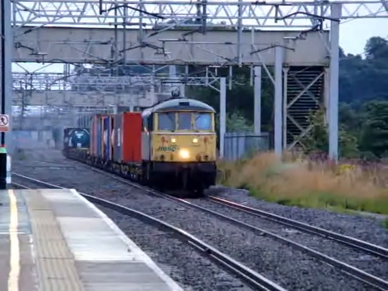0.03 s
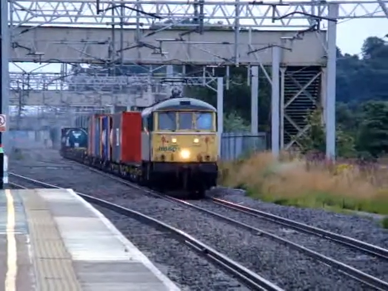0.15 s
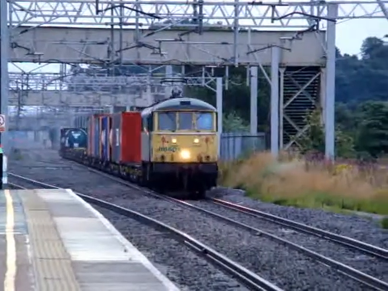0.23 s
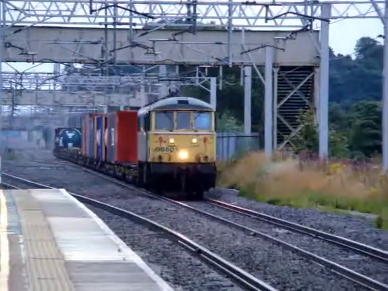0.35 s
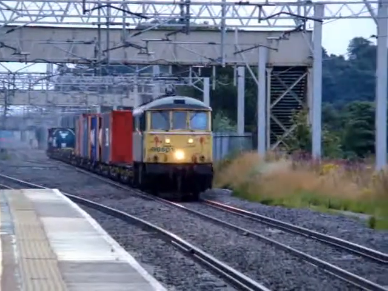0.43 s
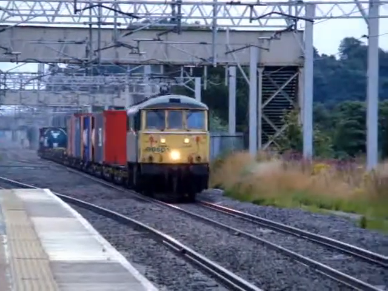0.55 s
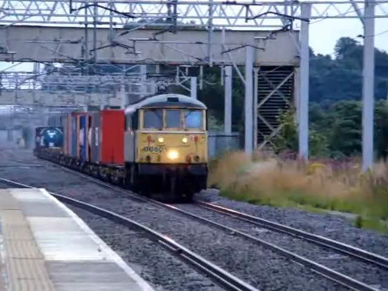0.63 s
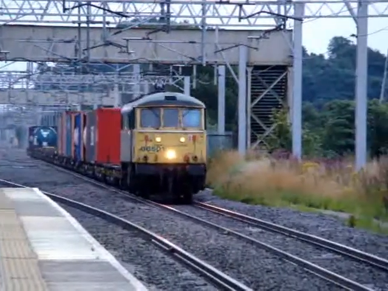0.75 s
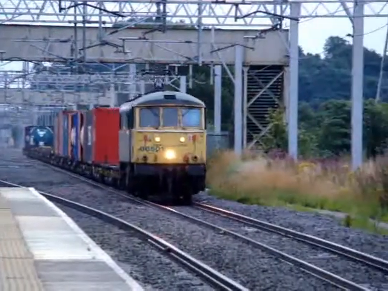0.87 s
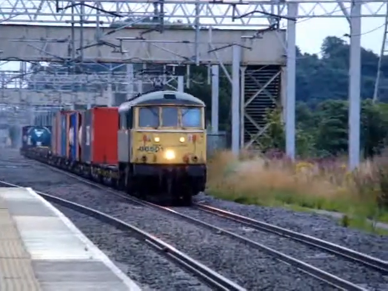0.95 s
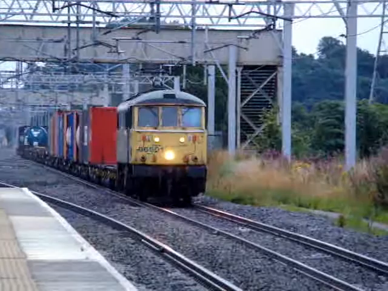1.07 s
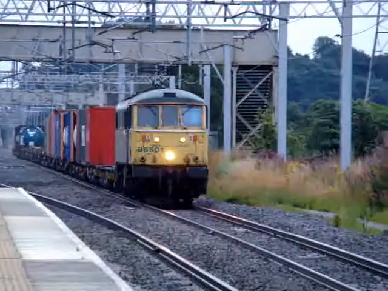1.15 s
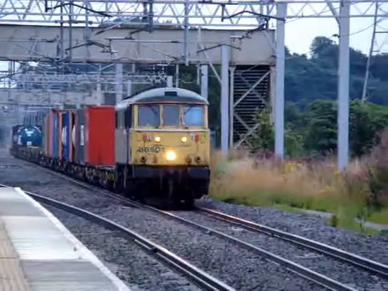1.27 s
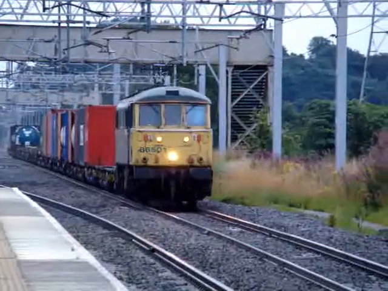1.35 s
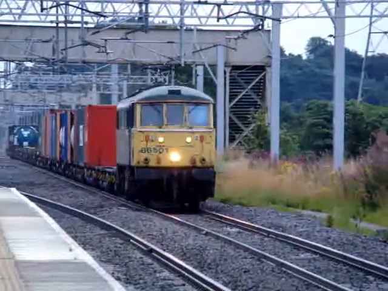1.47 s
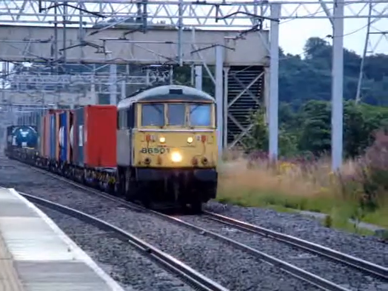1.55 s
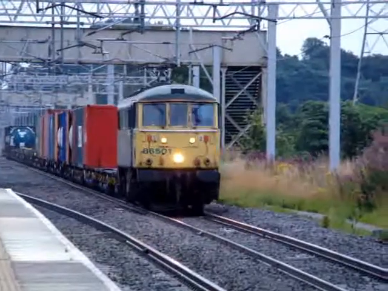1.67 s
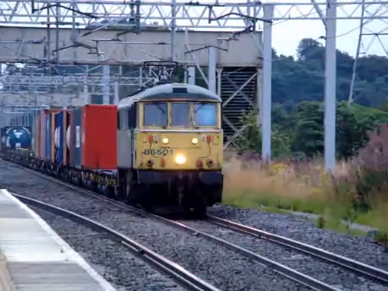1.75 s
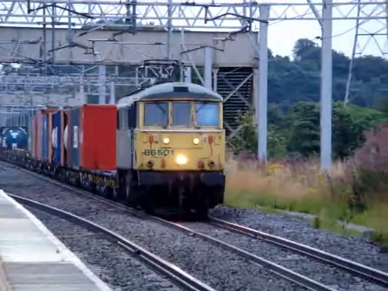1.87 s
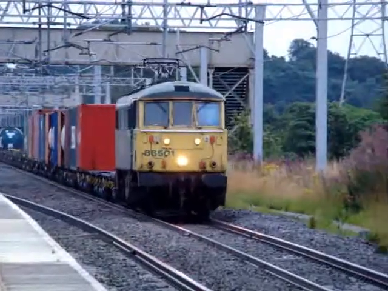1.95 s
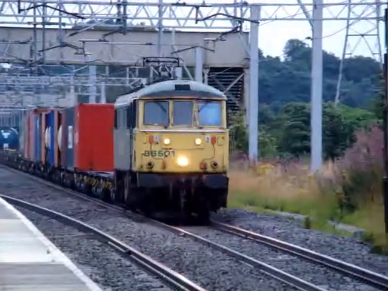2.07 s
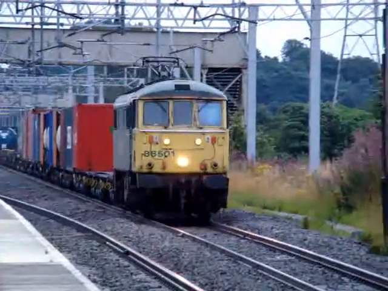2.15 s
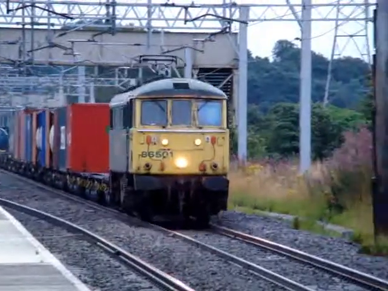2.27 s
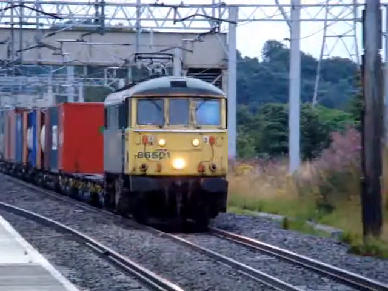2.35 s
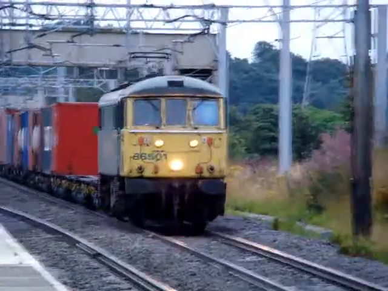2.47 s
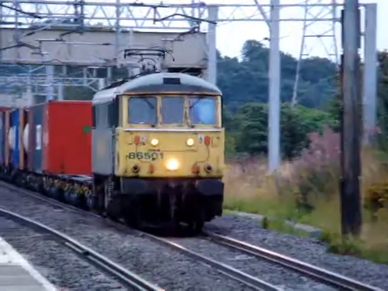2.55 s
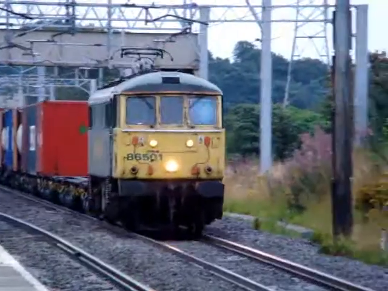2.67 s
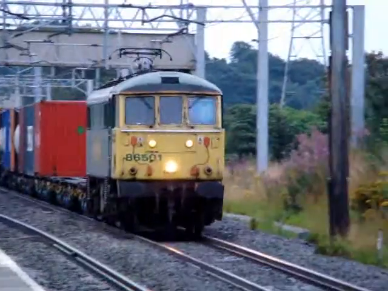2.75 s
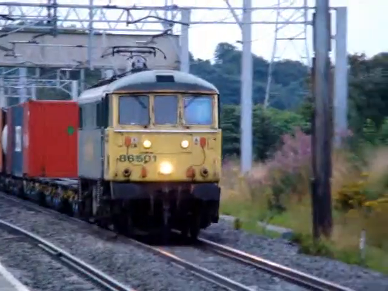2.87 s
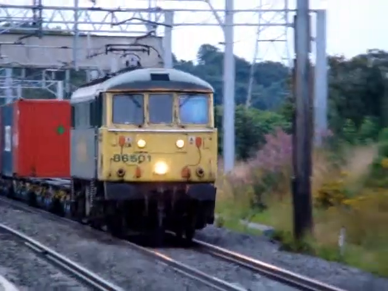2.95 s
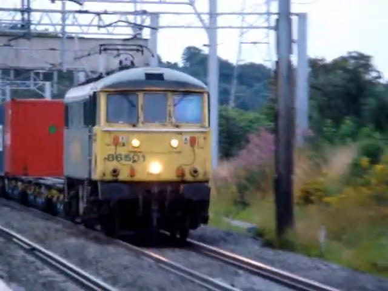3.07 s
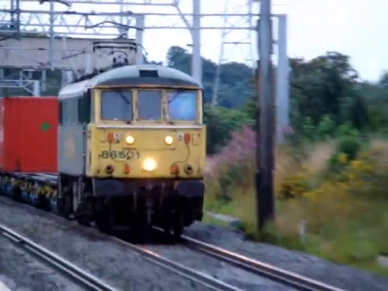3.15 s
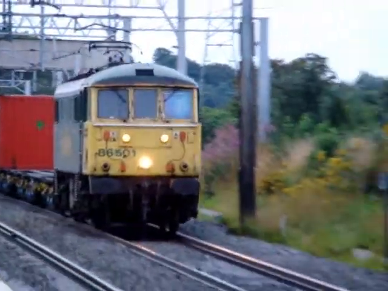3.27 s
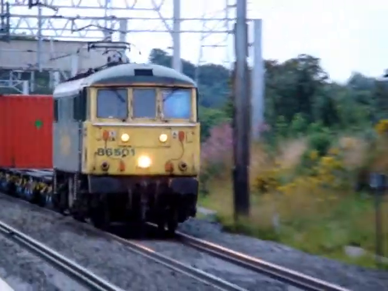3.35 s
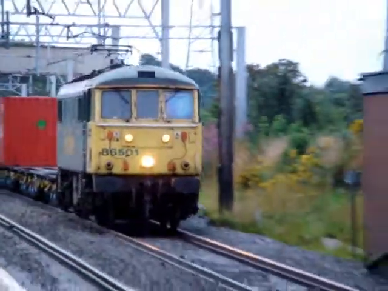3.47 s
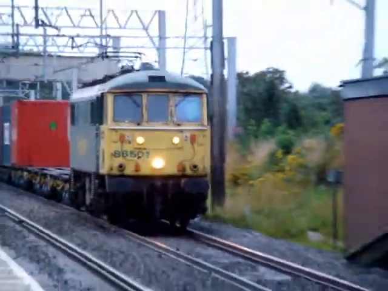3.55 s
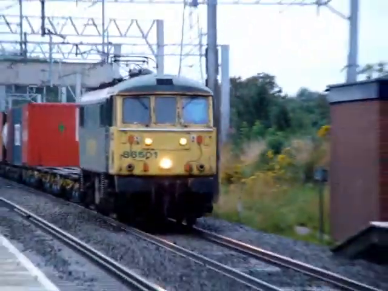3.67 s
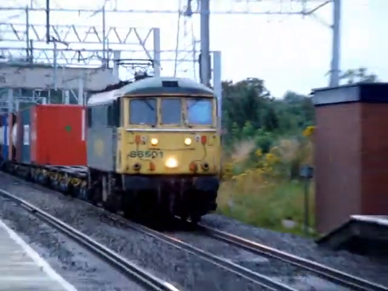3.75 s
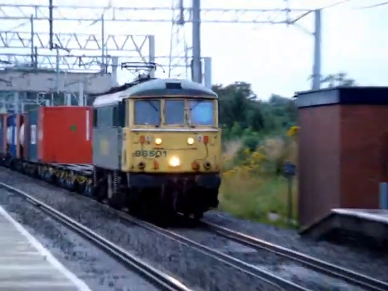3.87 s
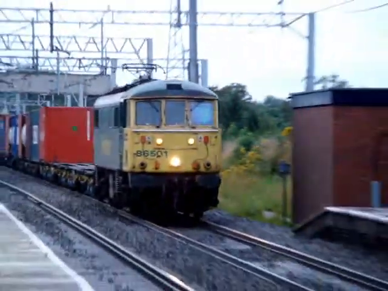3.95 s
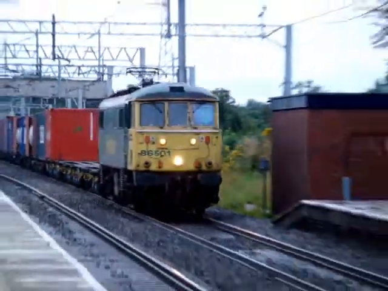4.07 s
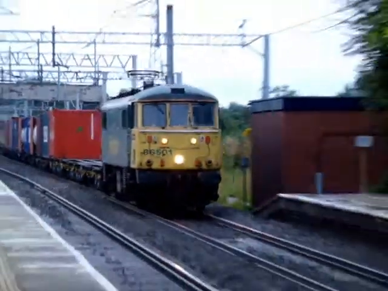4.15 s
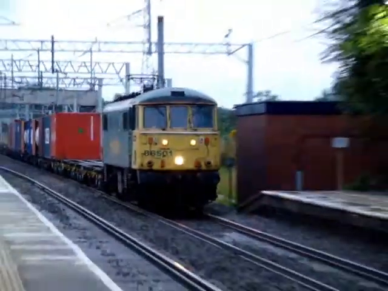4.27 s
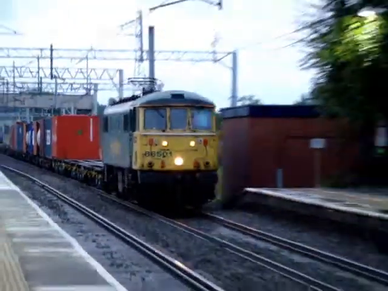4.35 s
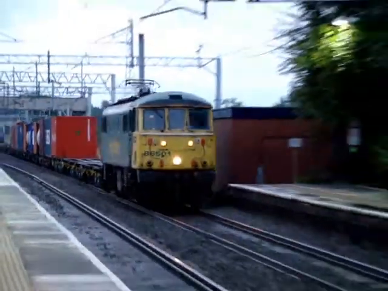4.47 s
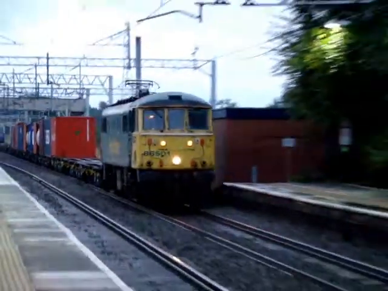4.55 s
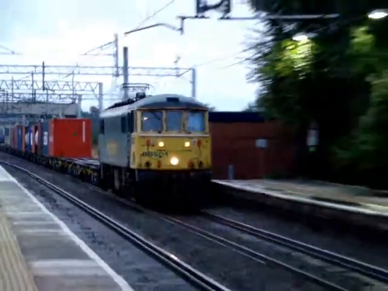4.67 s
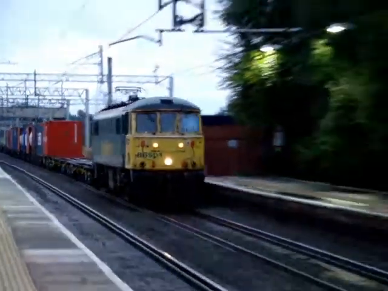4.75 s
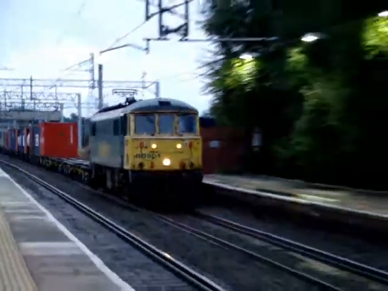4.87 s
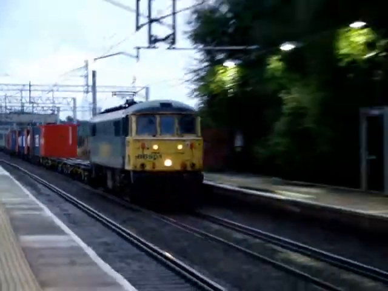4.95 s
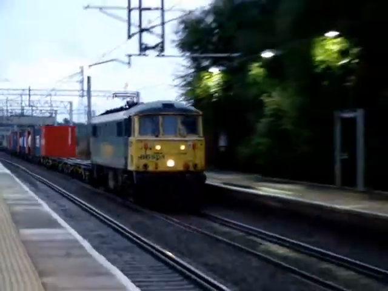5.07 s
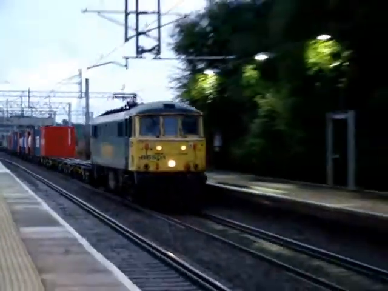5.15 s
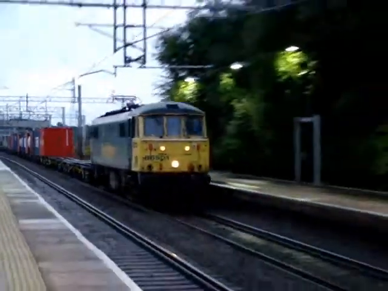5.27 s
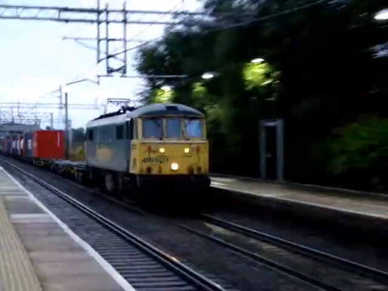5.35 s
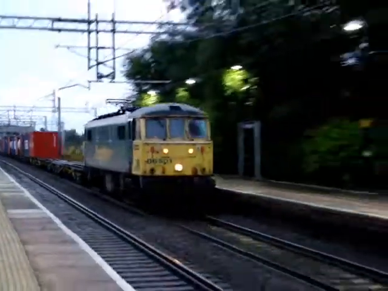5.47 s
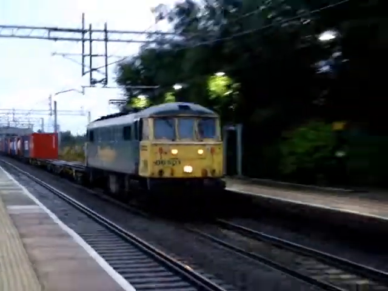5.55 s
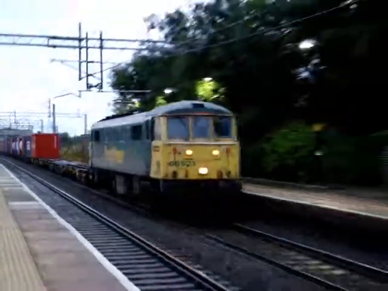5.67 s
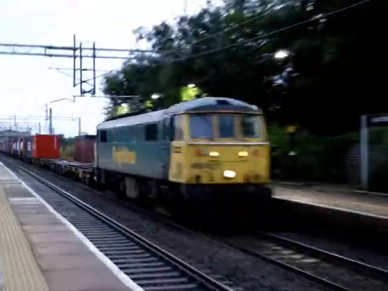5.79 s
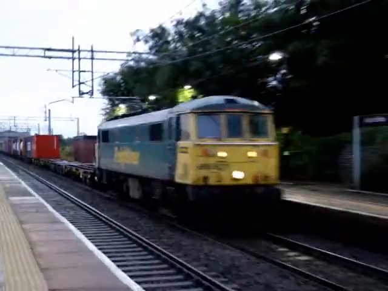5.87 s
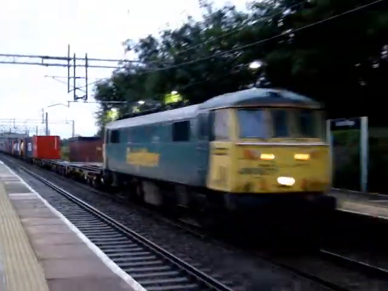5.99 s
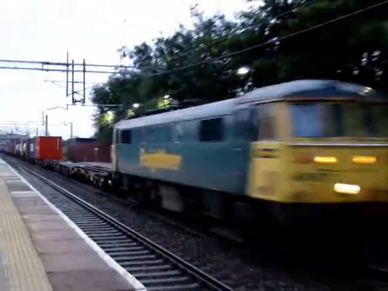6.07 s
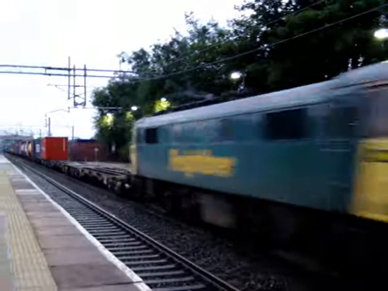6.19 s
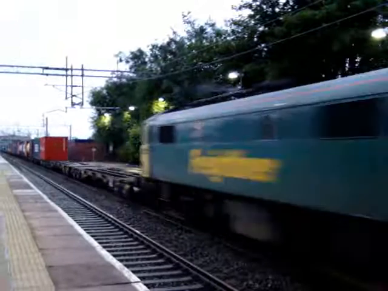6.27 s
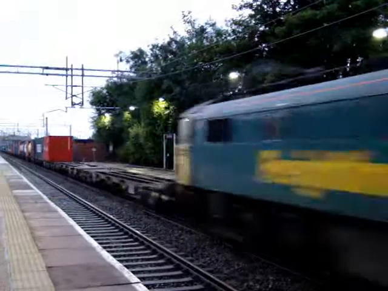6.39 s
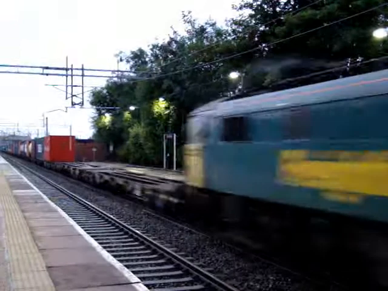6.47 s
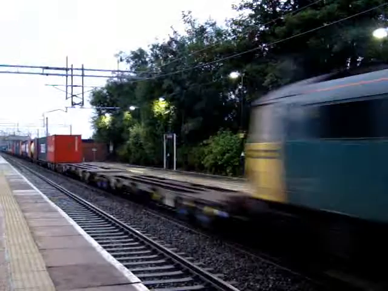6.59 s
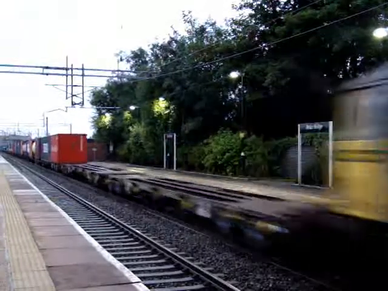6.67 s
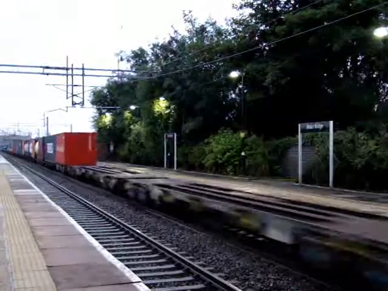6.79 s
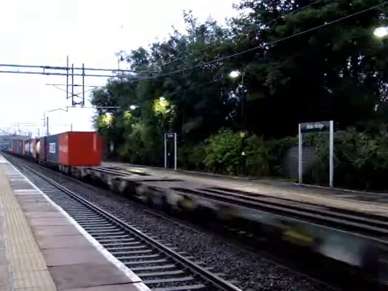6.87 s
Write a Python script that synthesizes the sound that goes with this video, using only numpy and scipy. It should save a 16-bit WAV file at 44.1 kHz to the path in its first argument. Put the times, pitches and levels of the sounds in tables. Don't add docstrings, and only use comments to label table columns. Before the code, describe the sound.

Distant wheel roar grows into a loud, bright rush beside the platform, rails humming and clanking, a plastic snap close to the microphone.

```python
import sys
import numpy as np
from scipy import signal
from scipy.fft import rfft, irfft, next_fast_len
from scipy.io import wavfile
from scipy.ndimage import uniform_filter1d

SR = 44100
rng = np.random.default_rng(int(sys.argv[2]) if len(sys.argv) > 2 else 0)


def boost(x):
    u = np.asarray(x, float) / 20
    return 10 ** u


def transcribe(signal):
    frames = np.atleast_2d(signal).T
    limited = np.clip(frames, -1, 1)
    pcm = np.round(limited * 32767).astype(np.int16)
    wavfile.write(sys.argv[1], SR, pcm)


N = 305538
T = np.arange(N) / SR
FFT_LEN = 2 * next_fast_len(N // 2 + 1)
HZ = np.fft.rfftfreq(FFT_LEN, 1 / SR)


def unit(x):
    return x / np.sqrt(np.mean(x ** 2))


def curve(points):
    return np.interp(T, *np.transpose(points))


def decay(t, t60):
    return np.exp(-np.log(1000) * t / t60)


def swell(centre_s, length_s):
    return np.exp(-.5 * (2 * (T - centre_s) / length_s) ** 2)


def coloured(colour):
    hz, db = np.transpose(colour)
    gain = boost(np.interp(np.log(HZ + 1), np.log(hz), db, left=-120, right=-120))
    return gain * rfft(rng.standard_normal(FFT_LEN))


def walk(rate):
    hold = int(SR / rate)
    steps = np.repeat(rng.standard_normal(N // hold + 1), hold)
    return unit(uniform_filter1d(uniform_filter1d(steps, hold), hold)[:N])


def resonance(x, hz, width):
    return unit(signal.lfilter(*signal.iirpeak(hz, hz / width, fs=SR), x))


def band_of(x, lo_hz, hi_hz):
    return irfft(rfft(x, FFT_LEN) * ((HZ > lo_hz) & (HZ < hi_hz)))[:N]


# t/s, train through the air level/dB, vibration along the rails level/dB
APPROACH = [(0, -37, -33), (1.0, -37, -32.5), (1.401, -35, -30.5), (2.4, -33.5, -30), (2.75, -33.5, -26),
            (3.3, -33, -25), (3.7, -31.5, -22), (4.3, -28, -20), (4.75, -25.5, -19), (5.1, -22.5, -16),
            (5.45, -24.5, -16.5), (6.05, -24, -14.5), (6.5, -21.5, -16), (6.93, -24, -15.5)]
# from f/Hz, to f/Hz
ROAR_RANGES = [(120, 400), (500, 1100), (1500, 4000), (4500, 11000)]
# f/Hz, level/dB per Hz
FAR_COLOUR = [(74, -45), (125, -16), (221, -7.5), (254, -14), (282, -6.5), (345, -14), (562, -7),
              (933, -3.5), (1190, -15), (1290, -9), (2850, -16.5), (5680, -26.5), (6820, -27.5),
              (14800, -38.5), (16000, -24)]
# f/Hz, level/dB per Hz
NEAR_COLOUR = [(100, -45), (212, -19), (300, -16), (440, -12), (575, -11.5), (700, -3.5), (1160, -10.5),
               (2000, -14.5), (4140, -21.5), (7000, -25.5), (9500, -26), (10500, -34.5), (14400, -32),
               (16000, -39)]
# t/s, share of the close colour [0-1]
CLOSENESS = [(0, 0), (2.2, 0.1), (2.6, 0.47), (4.5, 0.95), (6.0, 0.93), (6.93, 1.)]
RUMBLE_DB, HISS_FAR_DB, HISS_CLOSE_DB = -7.5, -10.5, -4
LEVEL_S, LEVEL_RISE_S, LEVEL_DB = 5.87, 0.81, 5


def range_levels(noise):
    powers = [2 * np.sum(np.abs(noise[(HZ > lo) & (HZ < hi)]) ** 2) for lo, hi in ROAR_RANGES]
    return 10 * np.log10(powers) - 20 * np.log10(2 * len(HZ))


def roar(slow_db=0.23, grit_db=0.49, own_db=0.53):
    s, air_db, rail_db = np.transpose(APPROACH)
    air, rail = np.interp(T, s, air_db), np.interp(T, s, rail_db)
    share = np.clip(curve(CLOSENESS), 0, 1)
    wheel = air + LEVEL_DB * np.clip((T - LEVEL_S) / LEVEL_RISE_S, 0, 1)
    hiss = air + HISS_FAR_DB + (HISS_CLOSE_DB - HISS_FAR_DB) * share
    levels = np.array([air + RUMBLE_DB, rail, wheel, hiss])

    centres = np.log([np.sqrt(lo * hi) for lo, hi in ROAR_RANGES])
    slow, grit = walk(9), walk(90)
    far_noise, near_noise = coloured(FAR_COLOUR), coloured(NEAR_COLOUR)
    far_own, near_own = range_levels(far_noise), range_levels(near_noise)
    out = 0
    for hz in 2. ** np.arange(6, 14.5, .5):
        band = np.clip(1 - np.abs(2 * np.log2((HZ + 1) / hz)), 0, 1)
        mix = np.array([np.interp(np.log(hz), centres, one) for one in np.eye(len(centres))])
        far = irfft(far_noise * band)[:N] * boost(-mix @ far_own)
        near = irfft(near_noise * band)[:N] * boost(-mix @ near_own)
        sway = slow_db * slow + min(hz / 6000, 1) * grit_db * grit + own_db * walk(13)
        out = out + (np.sqrt(1 - share) * far + np.sqrt(share) * near) * boost(mix @ levels + sway)
    return out


def singing(hz, width, start, stop):
    on = (T >= start) & (T <= stop)
    t = T[on]
    fade_s = min(.35, (stop - start) / 4)
    inside = np.minimum(t - start + (start == 0), stop - t)
    heard = np.sin(np.clip(inside / fade_s, 0, 1) * np.pi / 2) ** 2
    drift = np.cumsum(rng.standard_normal(len(t))) * np.sqrt(2 * np.pi * width / SR)
    steady = np.clip(1.3 - hz / 1200, .1, .8)
    tone = np.sqrt(2 * steady) * np.sin(2 * np.pi * hz * t + drift)
    both = tone + np.sqrt(1 - steady) * resonance(rng.standard_normal(len(t)), hz, width)
    patches_db = 2.5 * (1 - steady) * np.interp(t, np.arange(60) / 8, rng.standard_normal(60))
    out = np.zeros(N)
    out[on] = heard * boost(patches_db) * resonance(both, hz, 3 * width)
    return out


# f/Hz, width f/Hz, level/dB against the rail vibration
FAR_TRACK = [(575, 30, -11.5), (660, 25, -11), (935, 50, -10.5), (1030, 30, -12), (1320, 60, -17),
             (1430, 40, -17), (6900, 70, -28)]
PLATFORM_RAIL = [(562, 16, -16), (611, 16, -14), (661, 11, -8.5), (712, 13, -4), (825, 18, -10),
                 (864, 18, -9.5), (1215, 20, -18), (6850, 60, -25), (7270, 60, -27)]
CURVE_TRACK = [(778, 16, -8), (1315, 25, -15), (1355, 25, -12.5), (1700, 18, -20), (1893, 25, -14),
               (2775, 60, -21), (9360, 400, -27)]
NEAR_TRACK = [(657, 13, -5.5), (1308, 36, -9.5), (9400, 500, -26), (10800, 30, -38)]
ALONGSIDE = [(611, 16, -14), (674, 16, -3), (864, 16, -13), (1065, 25, -13), (2060, 160, -15.5),
             (2750, 80, -21)]
CAPSULE = [(11400, 150, -31), (12810, 80, -33)]
# from t/s, to t/s
LOADED = [
    (0, 2.4),
    (2.3, 6.2),
    (2.9, 4.7),
    (4.65, 5.95),
    (5.9, 7.4),
    (0, 7.4),
]
# from t/s, to t/s, f/Hz, width f/Hz, level/dB
FLANGES = [(.2, .5, 6900, 20, -18), (.5, 1.1, 1700, 25, -13), (1.2, 2.3, 3000, 80, -17),
           (1.6, 2.4, 2780, 70, -13), (2.95, 3.4, 866, 22, -4), (4.3, 6.25, 1938, 30, -14.5),
           (4.4, 5.4, 748, 12, -9), (4.5, 5.5, 9765, 40, -26), (4.8, 5.3, 780, 14, -4.5),
           (4.9, 5.75, 1350, 25, -10), (5.75, 6.2, 685, 16, -4.5), (6.05, 6.7, 400, 120, -11),
           (6.7, 7.1, 815, 20, -4)]


def song():
    out = np.zeros(N)
    tracks = FAR_TRACK, PLATFORM_RAIL, CURVE_TRACK, NEAR_TRACK, ALONGSIDE, CAPSULE
    for (start, stop), modes in zip(LOADED, tracks):
        for hz, width, db in modes:
            out += boost(db) * singing(hz, width, start, stop)
    for start, stop, hz, width, db in FLANGES:
        out += boost(db) * singing(hz, width, start, stop)
    s, _, rail_db = np.transpose(APPROACH)
    return out * boost(np.interp(T, s, rail_db))


# t/s, peak level/dB
JOINTS = [
    (1.191, -21),
    (4.778, -8),
    (4.888, -9),
]


def joints():
    out = np.zeros(N)
    for s, db in JOINTS:
        t = np.clip(T - s, 0, None)
        out += boost(db - 1) * decay(t, .06) * np.sin(2 * np.pi * 760 * t)
    return out


# f/Hz, level/dB, t60/s
CASING = [(1610, -4, 0.09), (1710, -15, 0.027), (980, -13, .04), (2300, -7, .02), (3150, -5, .012),
          (4600, -15, .01), (10500, -30, 0.033), (13900, -29, .03)]
# from f/Hz, to f/Hz, level/dB
CRACK = [(1520, 3100, 21.5), (3630, 4100, 9), (6500, 14000, 6), (13300, 15000, -4)]
# width t/s, f/Hz, level/dB
KNOCK = (.005, 860, -13)
# width t/s, f/Hz, level/dB
BUMP = (.0021, 195, -16.5)
SNAP_S, KNOCK_S, BUMP_S = 2.8127, 3.0805, 3.0874
CRACK_S, SNAP_HOLD_S = .00006, .0058


def handling():
    t = np.clip(T - SNAP_S, 0, None)
    ring = sum(boost(db) * np.sin(2 * np.pi * hz * t) * decay(t, t60) for hz, db, t60 in CASING)
    burst = (t > 0) * np.exp(-t / CRACK_S)
    crack = np.zeros(N)
    for lo, hi, db in CRACK:
        crack += boost(db) * signal.lfilter(*signal.butter(2, (lo, hi), "bandpass", fs=SR), burst)
    snap = np.clip(crack - ring * np.exp(-(t / SNAP_HOLD_S) ** 4), -.9, .9)
    taps = np.zeros(N)
    for s, (width, hz, db) in ((KNOCK_S, KNOCK), (BUMP_S, BUMP)):
        taps += boost(db) * np.cos(2 * np.pi * hz * (T - s)) * np.exp(-.5 * ((T - s) / width) ** 2)
    return signal.lfilter(*signal.butter(2, 500, "highpass", fs=SR), snap) + taps


# t/s, level/dB
HUM = [(0, -56), (.9, -56.5), (1.45, -48), (2.25, -48.5), (2.5, -54.5), (3.0, -58.5), (4.5, -53.5),
       (6.93, -58)]
# f/Hz, level/dB
GEAR_LINES = [(58, -62), (70, -68.5)]


def camera():
    hum = boost(curve(HUM)) * np.sin(2 * np.pi * 93 * T)
    whine = boost(-64 + 1.5 * walk(22)) * np.sin(2 * np.pi * 7870 * T)
    gears = sum(boost(db) * singing(hz, 2.7, 0, 8) for hz, db in GEAR_LINES)
    return np.sqrt(2) * (hum + whine) + gears


# f/Hz, level/dB per Hz
BUFFET_COLOUR = [(15, -25), (30, -14), (45, -13), (58, -7), (72, -3.5), (90, -12), (130, -2), (200, -24)]
# t/s, length t/s, level/dB
GUSTS = [(1.2, .3, -60), (3.2, 1.3, -51), (3.9, .2, -51), (4.5, .3, -55), (5.09, 0.4, -46),
         (6.16, .25, -54), (6.46, 0.22, -61)]


def wind():
    strength = boost(-67) + sum(boost(db) * swell(s, length) for s, length, db in GUSTS)
    return unit(irfft(coloured(BUFFET_COLOUR))[:N]) * strength


# t/s, length t/s, f/Hz, spread f/Hz, level/dB
CHIRPS = [
    (.2, .09, 4400, 500, -44),
    (1.07, .05, 6300, 1300, -47),
    (2.65, .02, 3750, 250, -41),
]


def birds():
    out = np.zeros(N)
    for s, length, hz, spread, db in CHIRPS:
        out += boost(db) * swell(s, length) * resonance(rng.standard_normal(N), hz, spread)
    return out


def scene():
    rest = roar() + song() + joints() + camera() + wind() + birds()
    dipped = uniform_filter1d(1. * (np.abs(T - SNAP_S - .008) < .018), size=200)
    return (rest - 0.64 * dipped * band_of(rest, 1500, 20000) + handling())[None]


def top_cut(x):
    return signal.sosfilt(signal.butter(12, 16630, fs=SR, output="sos"), x)


def record(dry):
    x = np.clip(dry[0], -1, 1) * np.clip((T[-1] - T) / .004, 0, 1)
    x = signal.lfilter(*signal.butter(1, 30, "highpass", fs=SR), x)
    x = x - .97 * band_of(x, 15470, SR / 2)
    for lo_hz in np.arange(11550, 12600, 175):
        kept = boost(-7) * uniform_filter1d(1. * (walk(22) > -.4 + T / 9), size=400)
        x = x - (1 - kept) * band_of(x, lo_hz, lo_hz + 175)
    for lo_hz in (10200, 10500, 10900, 13400, 14000, 14500):
        lost = uniform_filter1d(1. * (walk(14) > 1.3) * (T > 3), size=400)
        x = x - lost * band_of(x, lo_hz, lo_hz + 175)
    return top_cut(x[None])


dry = scene()
out = record(dry)
transcribe(out)
```